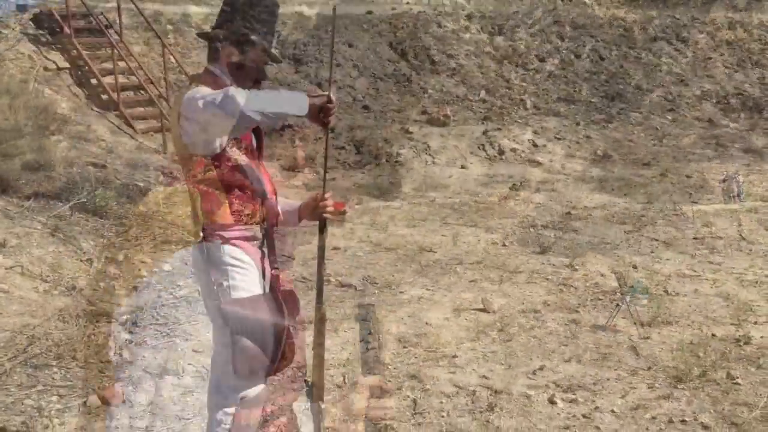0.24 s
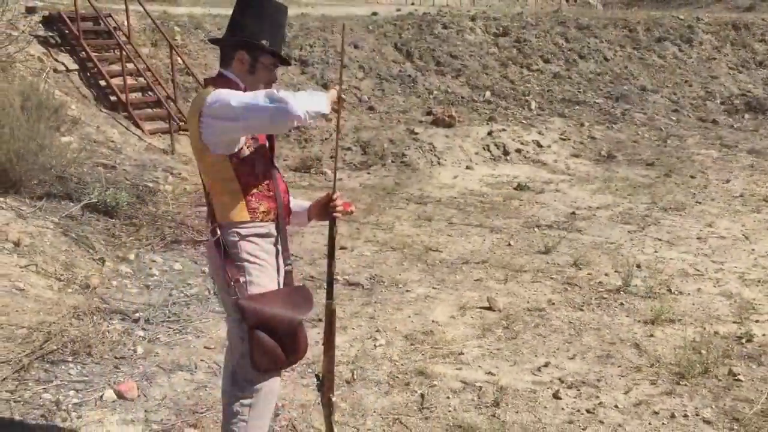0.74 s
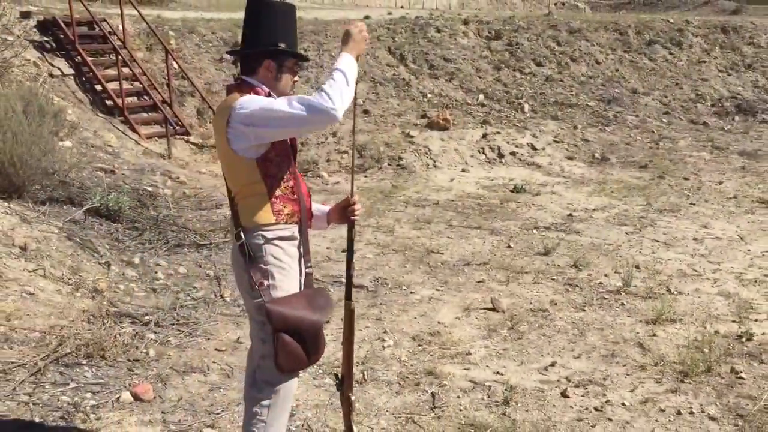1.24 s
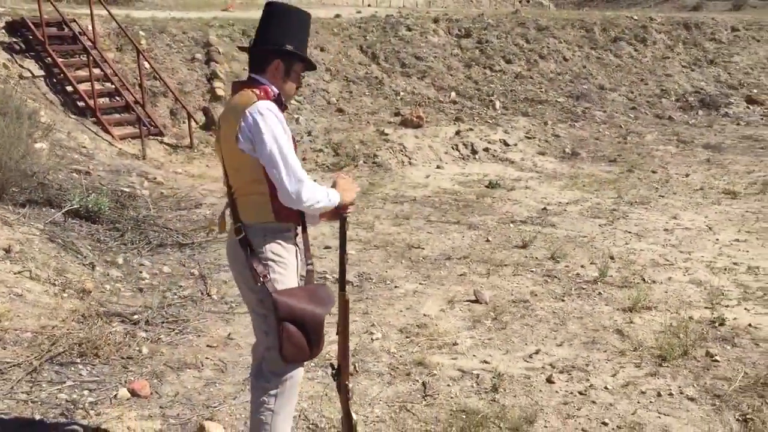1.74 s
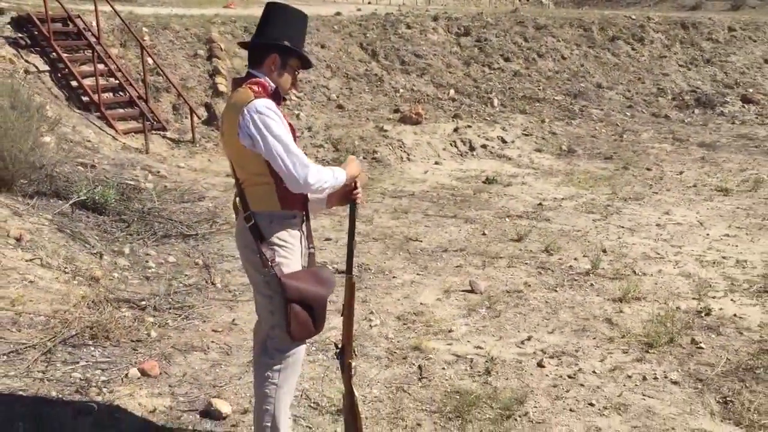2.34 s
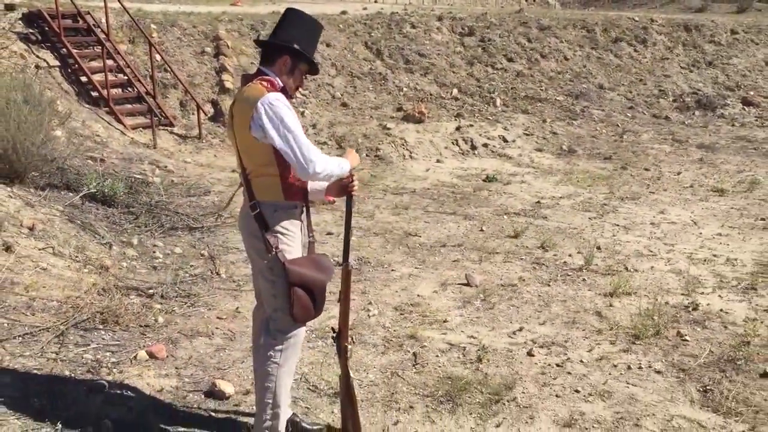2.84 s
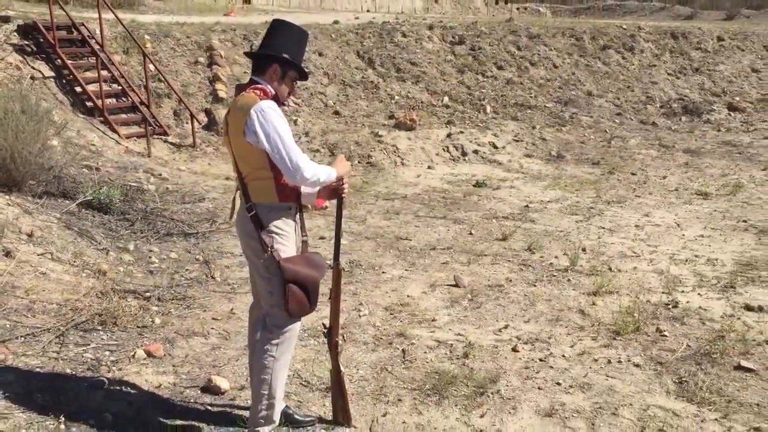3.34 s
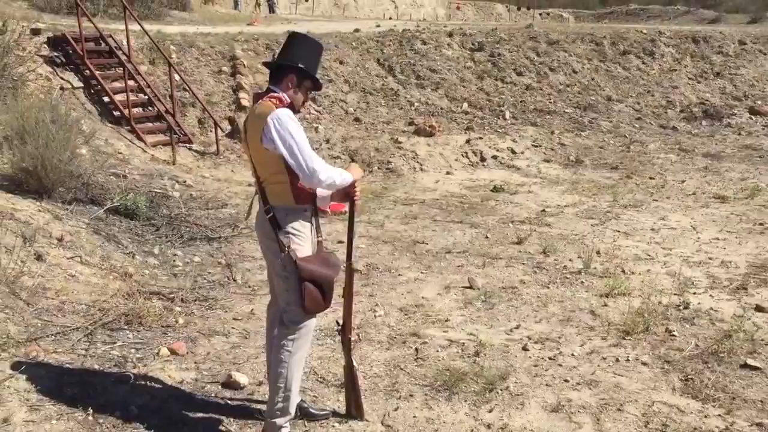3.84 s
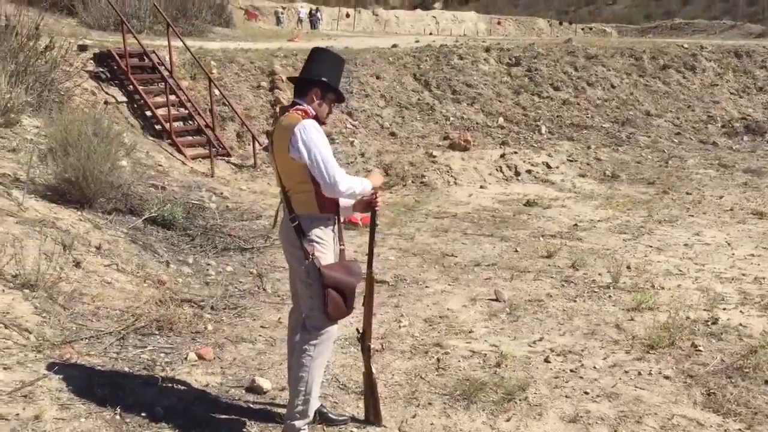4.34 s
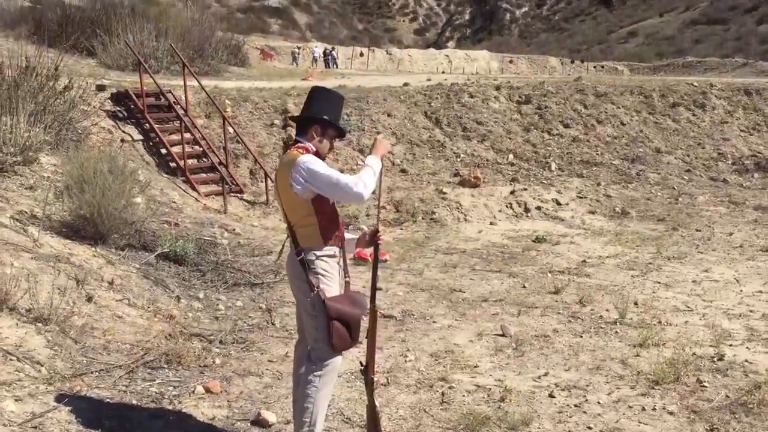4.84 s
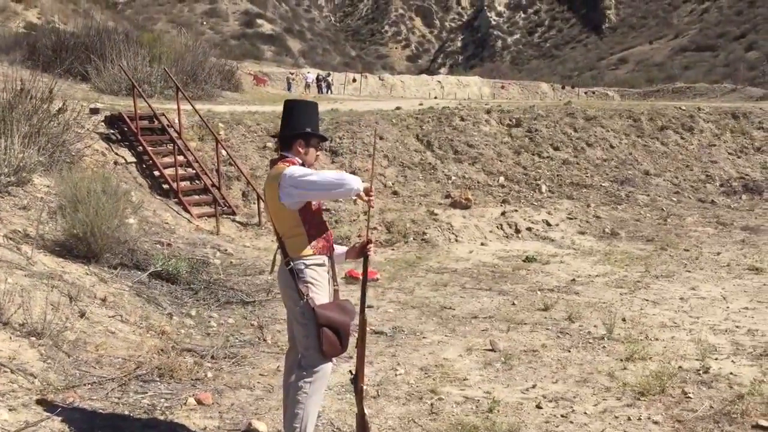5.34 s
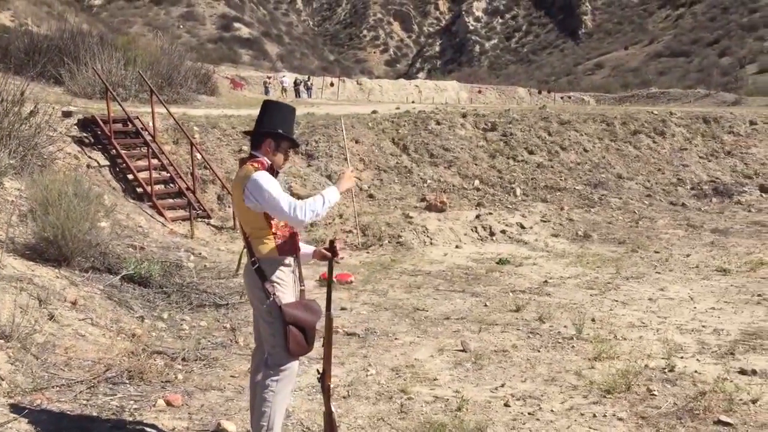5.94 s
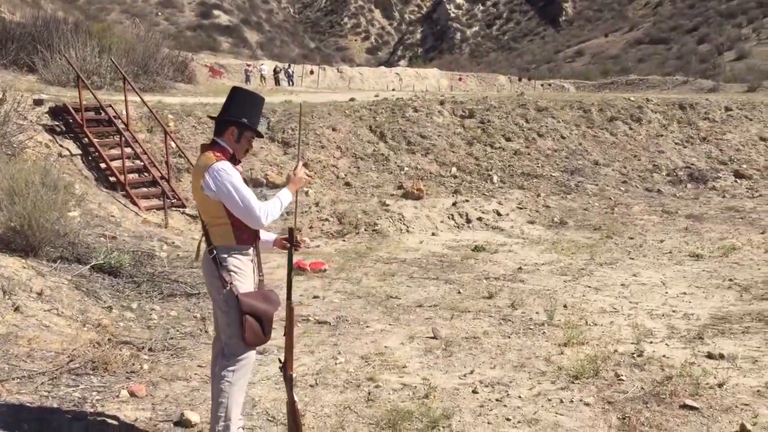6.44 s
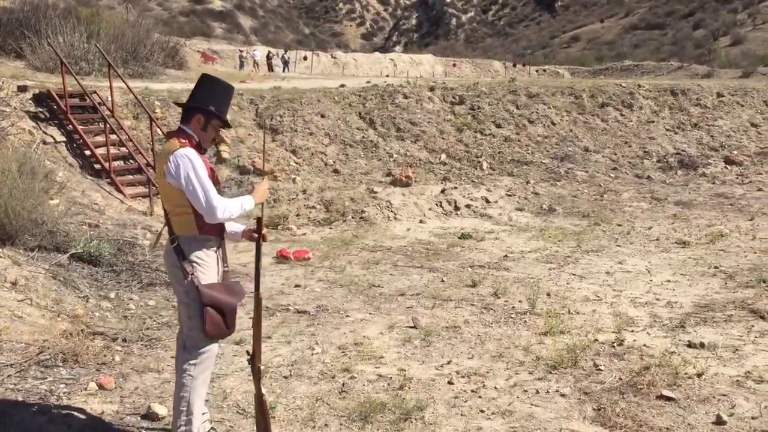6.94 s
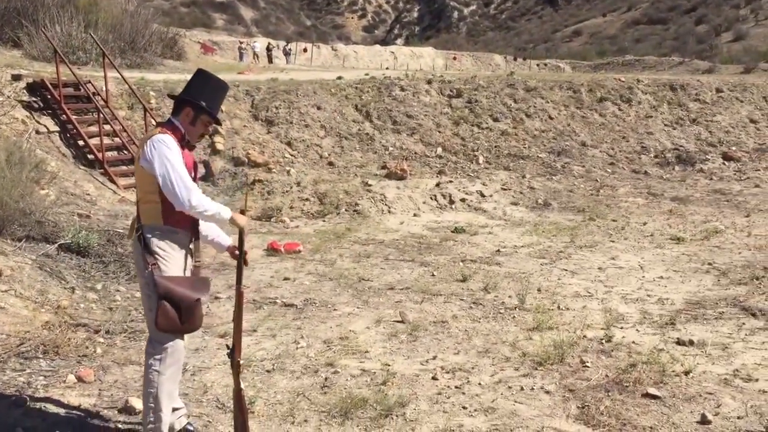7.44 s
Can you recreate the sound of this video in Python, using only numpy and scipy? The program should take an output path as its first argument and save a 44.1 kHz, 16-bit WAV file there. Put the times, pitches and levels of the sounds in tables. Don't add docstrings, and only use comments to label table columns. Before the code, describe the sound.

Low wind rumbles and puffs against an exposed microphone while a rifle is loaded nearby. Scattered steel clicks lead to a soft sliding hiss, then two seconds of steady, rattling ramming, hard dry clacks with hollow barrel colour and light wooden knocks. The rod grazes out, fingers squeak, cloth rubs. After a windy lull come a strong gust and sharp closing clacks, with almost no echo.

```python
import sys
import numpy as np
from scipy import signal
from scipy.fft import rfft, irfft, next_fast_len
from scipy.io import wavfile
from scipy.ndimage import uniform_filter1d, map_coordinates

SR = 44100
rng = np.random.default_rng(int(sys.argv[2]) if len(sys.argv) > 2 else 0)


def store_pcm(level_fs):
    pcm = np.round(np.clip(level_fs, -1, 1) * 32767).astype(np.int16)
    wavfile.write(sys.argv[1], SR, np.atleast_2d(pcm).T)


def makeup_ratio(level_db):
    decades = np.asarray(level_db, float) / 20
    return 10 ** decades


N = 339129
SIZE = 8192


def unit(x):
    return x / np.sqrt(np.mean(x ** 2, axis=-1, keepdims=True) + 1e-20)


def peaked(x):
    return x / np.abs(x).max(axis=1, keepdims=True)


def columns(table):
    return np.transpose(table)[:, :, None]


def shape(points, hz):
    point_hz, db = np.transpose(points)
    return makeup_ratio(np.interp(np.log(hz + 1), np.log(point_hz + 1), db))


def gains(spans):
    t = np.arange(N) / SR
    total = 0
    for rows in spans:
        s, *levels_db = np.transpose(rows)
        edge = np.clip(np.minimum(t - s[0], s[-1] - t) / .008, 0, 1)
        total = total + edge * makeup_ratio([np.interp(t, s, db) for db in levels_db])
    return total


def wobble(rate):
    knots = rng.standard_normal(int(N * rate / SR) + 4)
    return map_coordinates(knots, [np.arange(N) * rate / SR])


def filtered(x, response):
    m = next_fast_len(x.shape[-1] + SIZE)
    return irfft(rfft(x, m) * response(np.fft.rfftfreq(m, 1 / SR)), m)[..., :x.shape[-1]]


def noise(spectrum, lumps_db, rate):
    lumpy = makeup_ratio(lumps_db * wobble(rate)) * rng.standard_normal(N)
    return unit(filtered(lumpy, lambda hz: shape(spectrum, hz)))


def resonances(hz, centre_hz, width_hz, db):
    centre, width = centre_hz[:, None], width_hz[:, None]
    damping = 1j * hz * width
    one = damping / (centre ** 2 - hz ** 2 + damping)
    return (makeup_ratio(db) * (-1.) ** np.arange(len(centre_hz))) @ one


def placed(s, rows):
    index = np.round(s * SR).astype(int) + np.arange(rows.shape[1])
    return np.bincount(index.ravel(), rows.ravel(), N + SIZE)[:N]


# time_s, peak_db, brush_before_s, rebound_after_s, rebound_db
BLOWS = [
    (2.6653, -24.5, .033, .067, -49),
    (2.904, -30, .0155, .0447, -34.5),
    (3.0646, -23.5, .015, .05, -31.5),
    (3.275, -24.5, .023, .0447, -32),
    (3.4875, -25.5, .0155, .0464, -26.5),
    (3.682, -25.5, .011, .033, -36.5),
    (3.895, -27.5, .032, .046, -38.5),
    (4.0966, -29, .008, .047, -37.5),
    (4.3106, -25, .016, .032, -44),
    (4.5296, -23, .017, .0414, -30.5),
]
# brush_hz, blow_hz, rebound_hz
BLOW_HZ = [(2000, 1000, 2000), (4500, 1100, 1900), (1900, 5000, 1450), (2200, 3500, 5240),
           (2600, 3500, 6600), (2500, 3700, 1000), (2900, 6500, 2350), (1050, 3500, 2150),
           (1020, 1900, 2500), (2900, 1100, 930)]
# time_s, peak_db, second_after_s, second_db
SKIPS = [(2.534, -38.5, .014, -30.5), (2.777, -37, .013, -39), (2.8447, -31.5, .0106, -34.5),
         (2.9912, -35.5, .009, -35.5), (3.152, -49, .0153, -39), (3.413, -36, .0093, -29),
         (3.57, -47, .0167, -30.5), (3.6412, -37, .0134, -40), (3.8065, -35, .01, -33),
         (4.025, -38.5, .0154, -29), (4.1874, -45, .017, -36.5), (4.4374, -41.5, .017, -33),
         (4.628, -44, .0074, -47.5)]
# first_hz, second_hz
SKIP_HZ = [(2100, 1860), (2090, 1860), (2500, 2500), (5200, 1840), (1890, 1850), (2500, 2500), (2330, 5200),
           (1860, 2500), (4070, 1880), (1880, 1890), (5290, 2500), (1880, 2550), (6000, 5200)]
# time_s, peak_db, strongest_hz
WALL = [(2.519, -52, 1750), (2.5694, -29, 2100), (2.61, -38, 2000), (2.619, -33, 1700),
        (2.8054, -32.5, 2200), (2.9685, -42, 1900), (3.012, -38, 2000), (3.0328, -34.5, 2260),
        (3.0954, -36, 2070), (3.2013, -36.5, 1840), (3.255, -41, 2000), (3.308, -44, 3700),
        (3.377, -40.5, 5200), (3.4422, -35, 2500), (3.725, -41, 2800), (3.7374, -46, 2500),
        (3.7822, -42.5, 2490), (3.8436, -29, 1100), (3.91, -42, 1500), (4.0003, -36, 1850),
        (4.0519, -37.5, 2800), (4.2297, -39, 1840), (4.2579, -27, 1980), (4.4009, -45, 5240),
        (4.4714, -37, 2500)]


def ramming():
    blow_t60, brush_t60, wall_t60 = .019, .022, .028
    brush_db = -35.5
    ring_db, ring_spread_db, t60_spread = -10, 4, .25
    rams = [(s, db, wall_t60, hz) for s, db, hz in WALL]
    for (s, db, after, second_db), (first_hz, second_hz) in zip(SKIPS, SKIP_HZ):
        rams += [(s, db, wall_t60, first_hz), (s + after, second_db, wall_t60, second_hz)]
    for (s, db, before, after, rebound_db), (brush_hz, blow_hz, rebound_hz) in zip(BLOWS, BLOW_HZ):
        rams.append((s - before, brush_db, brush_t60, brush_hz))
        rams.append((s, db, blow_t60, blow_hz))
        rams.append((s + after, rebound_db, blow_t60, rebound_hz))
    s, db, t60, hz = columns(rams)
    ring, length = columns(rng.standard_normal((len(rams), 2)))
    return contacts(s, db, ring_db + ring_spread_db * ring, t60 * np.exp(t60_spread * length), hz, ring_t60=.055)


# time_s, peak_db, ring_db, strongest_hz
RAISE = [(.31, -41, -25, 1400), (.362, -38, -20, 1840), (.401, -43, -42, 2060), (.494, -52.5, -34, 1900),
         (.777, -27, -42, 1150), (1.157, -43, -42, 1140), (1.184, -46.5, -36, 1640),
         (1.467, -40, -35, 1900), (1.48, -33.5, -19, 4200), (1.505, -18.5, -18, 2000),
         (1.864, -41, -14, 2070), (2.079, -53.5, -21, 1730)]
# time_s, peak_db, strongest_hz
DRAW = [(4.677, -41.5, 2700), (4.702, -45, 6600), (5.014, -49, 1800), (5.024, -45, 2500),
        (5.039, -43, 1100), (5.066, -46, 2300), (5.073, -41, 2400), (5.096, -45, 2300), (5.104, -45, 1900),
        (5.123, -45, 4000), (5.169, -48, 2450), (5.2, -38.5, 2300), (5.211, -48, 1500), (5.266, -55, 1600),
        (5.276, -50.5, 5200), (5.286, -50, 5200), (5.311, -52, 1900), (5.321, -48, 1850),
        (5.365, -57, 2300), (5.389, -52, 2900), (5.439, -43, 6000), (5.95, -61, 1950)]
# time_s, peak_db, ring_db, strongest_hz
STOW = [(6.651, -55.5, -17, 1760), (6.685, -46.5, -10.5, 1390), (6.753, -45.5, -12, 2440),
        (6.845, -50.5, -11, 931), (6.861, -50, -18, 926), (7.01, -47, -18, 1460), (7.053, -27.5, -8, 4530),
        (7.318, -21, -2, 1500), (7.327, -30, 0, 4500), (7.354, -46, 1, 3200), (7.471, -50, -4, 2120),
        (7.482, -53, -3, 2500), (7.545, -59.5, -8, 5850), (7.611, -22, -13, 2720), (7.619, -26, -20, 2020),
        (7.637, -13, -16, 1400)]


def handling():
    free_t60 = .105
    s, db, ring_db, hz = columns(RAISE)
    raised = contacts(s, db, ring_db, .042, hz, free_t60)
    s, db, hz = columns(DRAW)
    drawn = contacts(s, db, -17, .025, hz, free_t60)
    s, db, ring_db, hz = columns(STOW)
    return raised + drawn + contacts(s, db, ring_db, .032, hz, free_t60)


# pitch_hz, level_db (per Hz)
CHATTER = [(300, -33), (600, -28), (900, -8), (2000, -5), (4000, -2), (7000, -4), (10000, -5),
           (15000, -13.5), (17000, -11)]


def contacts(s, db, ring_db, t60, centre_hz, ring_t60):
    t = np.arange(SIZE) / SR
    grain, bounces = rng.standard_normal((2, len(s), SIZE))
    luck = rng.standard_normal((len(s), len(ROD_HZ)))
    fade = (1 - np.exp(-t / .0011)) * makeup_ratio(-60 * (t / np.clip(t60, .004, .09)) ** 1.25)
    force = fade * makeup_ratio(16 * uniform_filter1d(bounces, size=40)) * grain

    def steel(hz, plain):
        return shape(CHATTER, hz) * (plain + rod(hz, ring_t60, 3 * luck))

    def low(hz):
        return 1 / (1 + (hz / 7000) ** 8)

    def place(hz):
        return 1 + 1.7 * np.exp(-(np.log((hz + 1) / centre_hz) / 0.2) ** 2)

    body = filtered(force, lambda hz: steel(hz, .55) * low(hz) * place(hz) * bore(hz) ** .5)
    ring = filtered(force, lambda hz: steel(hz, .02 / ring_t60) * (1 - low(hz)))
    return placed(s, makeup_ratio(db) * (peaked(body) + makeup_ratio(ring_db + 3.5) * peaked(ring)))


ROD_HZ = [930, 1250, 1480, 1880, 2200, 2700, 3150, 3620, 4120, 4600, 5220, 5830, 6470, 7200, 7930, 8690,
          9460, 10300, 11150, 12020, 12920, 13840, 14830]
ROD_DB = [-1.5, .5, -11, 3, -5.5, -2, -11, -5, -10, -10, -9, -6.5, -8, -10, -8, -4, -6, -7, -3, -4, -1, -3,
          -7]


def rod(hz, t60, scatter_db=0):
    centre = np.array(ROD_HZ, float)
    width = np.log(1000) / np.pi / t60 * (1 + (4500 / centre) ** 1.3)
    return resonances(hz, centre, width, np.add(ROD_DB, scatter_db))


# pitch_hz, width_hz, level_db
BORE = [(950, 110, 2), (1900, 220, 3.5), (2600, 600, 0), (1330, 160, 0)]


def bore(hz):
    centre, width, db = np.transpose(BORE)
    return 1 + np.abs(resonances(hz, centre, width, db))


# time_s, peak_db, pitch_hz, t60_s
HUMS = [(.312, -48, 1400, .06), (.364, -45, 1850, .1), (.366, -54, 950, .06), (.402, -52, 1900, .14),
        (.5, -56, 950, .06), (1.16, -52, 1000, .06), (1.508, -32, 1950, .035), (2.668, -38, 950, .1),
        (3.846, -40, 1050, .1), (4.04, -44, 1890, .08), (5.075, -54, 1400, .14), (5.097, -45, 980, .09),
        (5.102, -48, 1850, .05), (5.207, -52, 1400, .06), (5.205, -52, 950, .06), (7.318, -21, 1600, .016)]


def hums():
    t = np.arange(SIZE) / SR
    s, db, hz, t60 = columns(HUMS)
    rough = 1 + .45 * unit(uniform_filter1d(rng.standard_normal((len(s), len(t))), size=150))
    fade = (1 - np.exp(-t / .0011)) * makeup_ratio(-60 * t / t60)
    return placed(s, makeup_ratio(db) * peaked(rough * np.sin(2 * np.pi * hz * t) * fade))


# time_s, peak_db, deep_share_db
KNOCKS = [(0.776, -47, -12), (1.156, -45, -9), (1.507, -37.5, -15.5), (2.615, -41, -8), (2.853, -40, 0),
          (3.065, -40.5, -5.5), (3.272, -36.5, -13), (3.486, -39.5, -3.5), (3.682, -43, -10),
          (3.896, -43.5, -3.5), (4.097, -38.5, 0.5), (4.311, -36.5, 0.5), (4.529, -36, 2),
          (5.036, -41, -0.5), (7.054, -47, -8), (7.319, -25, -20), (7.638, -23, -4)]


def knocks():
    t = np.arange(SIZE // 2) / SR
    s, db, deep_db = columns(KNOCKS)
    push = makeup_ratio(-60 * t / 0.025) * rng.standard_normal((len(s), len(t)))

    def mode(centre_hz, width_hz):
        centre, width = np.array([centre_hz]), np.array([width_hz])
        return peaked(filtered(push, lambda hz: resonances(hz, centre, width, np.zeros(1)) ** 2))

    return placed(s, makeup_ratio(db - 2.5) * (mode(665.0, 330.) + makeup_ratio(deep_db) * mode(235.0, 170.)))


# time_s, peak_db, pitch_hz
TICKS = [(0.092, -65, 696), (0.104, -58, 1400), (0.227, -47.5, 1173), (0.639, -65, 830), (0.918, -68, 950),
         (0.954, -63, 1530), (1.02, -56.5, 1910), (1.039, -63, 940), (1.081, -63, 1710),
         (1.396, -49.5, 2050), (1.423, -54, 2860), (1.612, -45, 1920), (1.614, -52, 950), (1.7, -41, 940),
         (1.745, -46, 950), (1.749, -37.5, 4100), (1.838, -39.5, 750), (2.137, -54.5, 1490),
         (2.16, -58, 620), (2.33, -56, 650), (2.233, -55, 1020), (2.465, -49.5, 1880), (5.367, -58, 2080),
         (6.497, -58, 1320), (6.731, -63, 725), (7.287, -64, 1810), (7.394, -52, 1500)]


def ticks():
    t = np.arange(SIZE // 2) / SR
    s, db, hz = columns(TICKS)
    rough = 1 + 0.77 * unit(uniform_filter1d(rng.standard_normal((len(s), len(t))), size=60))
    fade = (1 - np.exp(-t / 0.0014)) * makeup_ratio(-60 * t / 0.032)
    return placed(s, makeup_ratio(db) * peaked(rough * np.sin(2 * np.pi * hz * t) * fade))


# time_s, low_modes_db, high_modes_db
SCRAPES = [
    [(4.69, -57, -80), (4.8, -53, -76), (4.885, -54.5, -76), (4.9, -66, -84), (4.96, -70, -90)],
    [(5.43, -56, -62), (5.478, -56, -58), (5.515, -57, -62), (5.54, -66, -72)],
    [(7.055, -45, -43), (7.075, -53, -49), (7.098, -54, -50), (7.106, -66, -62), (7.128, -65, -66)],
    [(7.604, -55, -56), (7.624, -33, -32), (7.645, -40, -40), (7.69, -68, -71)],
]
# time_s, level_db
RATTLE = [
    [(0.55, -82), (0.706, -73), (0.858, -79), (1.45, -75)],
    [(2.45, -70), (2.56, -59), (2.75, -52), (2.9, -56), (3.22, -56.5), (3.65, -57), (4.3, -57), (4.68, -60)],
    [(5.0, -66), (5.2, -69), (5.43, -68)],
]


def scrapes():
    def sung(lumps_db, rate, plain, band):
        pattern = 5 * rng.standard_normal((6, len(ROD_HZ)))
        friction = noise(CHATTER, lumps_db, rate)
        ways = filtered(friction, lambda hz: band(hz) * (plain + rod(hz, .05, pattern)))
        share = makeup_ratio([7 * wobble(30) for _ in ways])
        return unit((share * ways).sum(axis=0) / np.linalg.norm(share, axis=0))

    def low_band(hz):
        return bore(hz) / (1 + (hz / 7300) ** 5) / (1 + (1200 / (hz + 1)) ** 2)

    def high_band(hz):
        return 1 / (1 + (7000 / (hz + 1)) ** 8)

    def rattle_band(hz):
        return bore(hz) ** .5 / (1 + (hz / 7000) ** 2) / (1 + 1400 / (hz + 1))

    low_gain, high_gain = gains(SCRAPES)
    low = drifting(sung(2, 130, .2, low_band))
    dead_hz, dead_width_hz = 3250, 260
    low = unit(filtered(low, lambda hz: 1 - .98 * np.exp(-((hz - dead_hz) / dead_width_hz) ** 2)))
    high = sung(2, 150, .12, high_band)
    rattle = drifting(sung(6.5, 80, .2, rattle_band))
    return low_gain * low + high_gain * high + gains(RATTLE)[0] * hang() * rattle


def drifting(x):
    speed = 1 + .016 * wobble(18)
    return map_coordinates(x, [np.cumsum(speed / speed.mean())], mode="mirror")


def hang():
    after_s, length_s, dip_db = .047, .035, -12
    s, _, _, rebound_after, _ = columns(BLOWS[1:])
    late = np.arange(N) / SR - s - rebound_after - after_s
    return makeup_ratio(dip_db * np.exp(-(late / length_s) ** 4).sum(axis=0))


# time_s, rasp_db, hiss_db
SLIDES = [
    [(0.72, -70, -86), (0.744, -69, -61.5), (0.785, -44, -50)],
    [(1.53, -58, -72), (1.556, -66, -71.5), (1.778, -42.5, -37), (1.88, -64, -65.5)],
    [(2.675, -64, -70), (2.74, -61, -63), (2.78, -63, -68)],
    [(2.99, -58, -68), (3.03, -60, -72)],
    [(3.59, -54, -70), (3.63, -58, -74), (3.68, -57, -70)],
]
# pitch_hz, level_db (per Hz)
RASP = [(710, -46), (1200, -13.5), (1900, -0.5), (2920, -3), (6000, -1.5), (7800, -16), (13200, -120)]
# pitch_hz, level_db (per Hz)
HISS = [(2650, -44), (4500, -6), (5900, 3), (7730, 4), (9210, -3), (14600, 1.5), (15700, -24), (16000, -34)]


def slides():
    rasp_gain, hiss_gain = gains(SLIDES)
    rasp = noise(RASP, lumps_db=1.5, rate=220)
    hiss = noise(HISS, lumps_db=1.2, rate=300)
    return rasp_gain * rasp + hiss_gain * hiss


# time_s, pitch_hz, level_db
SQUEAK = [
    (5.439, 1980, -75),
    (5.469, 3950, -49),
    (5.489, 4840, -44),
    (5.528, 5200, -64),
]


def squeak():
    s, hz, db = np.transpose(SQUEAK)
    t = np.arange(N) / SR
    rough = unit(uniform_filter1d(rng.standard_normal(N), size=45))
    phase = 2 * np.pi * np.cumsum(np.interp(t, s, hz)) / SR
    return makeup_ratio(np.interp(t, s, db, -120, -120)) * rough * np.sin(phase)


# time_s, level_db
SCUFFS = [
    [(1.14, -83), (1.16, -52), (1.24, -78)],
    [(4.96, -73), (5.04, -56), (5.17, -73)],
    [(5.55, -67), (5.58, -61.5), (5.682, -61), (5.85, -91)],
]
# pitch_hz, level_db (per Hz)
CLOTH = [(210, -26), (350, -10.5), (413, -7), (622, -9.5), (867, -5.5), (1770, -13), (6000, -26),
         (13000, -42)]


def scuffs():
    return gains(SCUFFS)[0] * noise(CLOTH, lumps_db=2.5, rate=60)


def ground(x):
    t = np.arange(SIZE) / SR
    tail = rng.standard_normal(SIZE) * makeup_ratio(-60 * t / 0.079) * (t > .004)
    tail = filtered(tail, lambda hz: 1 / (1 + 1j * hz / 5000))
    return signal.fftconvolve(x, tail / np.linalg.norm(tail))[:N]


# time_s, peak_db, t60_s
SLAPS = [
    (0.51, -31.5, 0.13),
    (1.987, -30, 0.089),
    (2.903, -37, 0.077),
    (6.878, -22.5, 0.089),
    (6.91, -31, 0.05),
    (7.018, -31, 0.11),
    (7.452, -39, 0.078),
    (7.543, -42, 0.06),
]


def slaps():
    s, db, t60 = columns(SLAPS)
    t = np.arange(SIZE) / SR
    puff = (1 - np.exp(-t / 0.0031)) * makeup_ratio(-60 * t / t60) * rng.standard_normal((len(s), SIZE))
    puff = filtered(puff, lambda hz: (1j * hz / (90 + 1j * hz)) ** 2 / (1 + 1j * hz / 300) ** 5)
    return placed(s, makeup_ratio(db) * peaked(puff))


# time_s, peak_db, rise_s (last 20 dB), fall_s (first 20 dB)
GUSTS = [(.07, -38, .5, .2), (.2, -42, .1, .06), (.32, -42, .08, .3), (.52, -28, .05, .07),
         (.62, -37, .1, .2), (.85, -42, .2, .1), (.97, -39, .12, .15), (1.06, -42, .1, .07),
         (1.13, -44, .06, .06), (1.27, -54, .3, .3), (1.45, -48, .15, .07), (1.58, -47, .07, .1),
         (1.8, -43, .4, .3), (1.985, -27, .06, .06), (2.05, -36, .08, .05), (2.21, -39.5, .14, .12),
         (2.3, -37, .07, .07), (2.39, -38, .06, .2), (2.56, -39, .2, .1), (2.74, -45, .06, .1),
         (2.91, -31, .22, .08), (3.21, -54, .3, .17), (3.41, -50, .09, .9), (3.75, -34, .1, .18),
         (4.03, -42.5, .25, .07), (4.28, -46, .15, .25), (4.77, -56, .9, .32), (5.12, -40, .07, .14),
         (5.42, -41, .11, .14), (5.7, -59, .9, .25), (6.38, -52, .55, .06), (6.51, -43, .045, .2),
         (6.78, -39, .4, .05), (6.91, -40, .07, .3), (7.04, -19, .075, .03), (7.47, -40, .14, .6),
         (7.69, -28.5, .2, .2)]
# time_s, level_db
FLAPS = [(0.0, -50), (0.34, -62), (1.2, -71), (1.5, -68), (1.84, -59.5), (2.48, -69), (2.78, -66),
         (2.91, -73), (3.43, -81), (3.94, -71), (4.77, -72), (5.95, -64), (6.15, -57), (6.57, -64),
         (6.85, -58), (7.07, -67), (7.32, -72), (7.69, -47)]
# pitch_hz, level_db (per Hz)
RUMBLE = [(15, -38), (25, -22), (46, 1.5), (76, 2), (104, -2.5), (200, -17), (260, -48.5), (440, -120)]
# pitch_hz, level_db (per Hz)
FLUTTER = [(65, -33), (110, -11.5), (237, -2.5), (290, -8.5), (389, -27), (502, -34), (700, -35),
           (910, -67), (1540, -120)]
# pitch_hz, level_db (per Hz)
SNAP = [(50, -40), (95, -6), (140, 0), (210, -7), (330, -22), (520, -45), (900, -120)]
# pitch_hz, level_db (per Hz)
AIR = [(180, -24.5), (300, -8), (360, -9.5), (624, -18.5), (1150, -18.5), (4990, -26.5), (6740, -27),
       (7690, -31.5), (9090, -28.5), (10600, -34.5), (12900, -31.5), (15000, -39), (16000, -56)]


def wind():
    calm_db, air_db = -11, -71
    snap_db, snap_grows = -14, 1.15
    eddy = wobble(14)
    rumble = unit(makeup_ratio(2 * eddy + 2 * wobble(8)) * noise(RUMBLE, lumps_db=2.5, rate=20))
    flutter = unit(makeup_ratio(2 * eddy + 1.5 * wobble(5)) * noise(FLUTTER, lumps_db=3.5, rate=22))
    snap = unit(makeup_ratio(2 * eddy) * noise(SNAP, lumps_db=4, rate=25))
    air = noise(AIR, lumps_db=.4, rate=9)
    s, db, rise, fall = columns(GUSTS)
    late = np.arange(N) / SR - s
    gust_db = np.max(db - 20 * np.maximum(-late / rise, late / fall), axis=0)
    snap_gain = makeup_ratio(snap_db + db.mean() + snap_grows * (gust_db - db.mean()))
    breeze = gains([FLAPS])[0]
    rumble_gain = makeup_ratio(gust_db) + makeup_ratio(calm_db) * breeze
    return rumble_gain * rumble + snap_gain * snap + breeze * flutter + makeup_ratio(air_db) * air


def scene():
    rifle = ramming() + handling() + hums() + knocks() + ticks()
    rifle = rifle + scrapes() + slides() + squeak() + scuffs()
    return (rifle + makeup_ratio(-18) * ground(rifle) + slaps() + wind())[None]


def band_limit(x):
    return signal.sosfilt(signal.butter(12, 16470, fs=SR, output="sos"), x)


def record(dry):
    mix = filtered(dry, lambda hz: np.interp(hz, [15100, 15500, 16400, 16460], [1, .15, .15, 0]))
    return band_limit(mix)


dry = scene()
out = record(dry)
store_pcm(out)
```